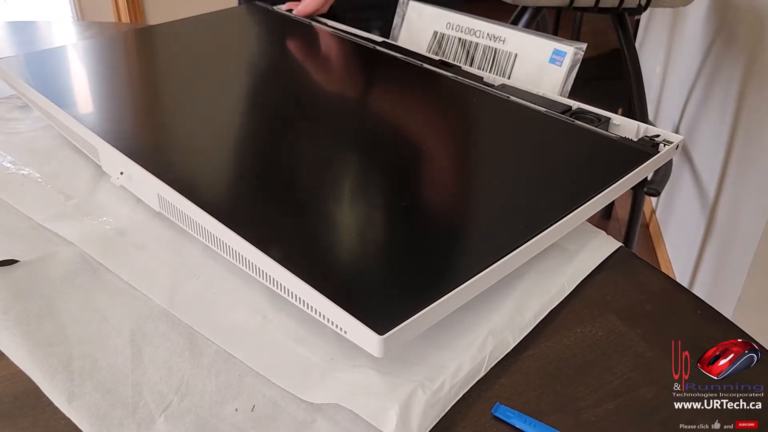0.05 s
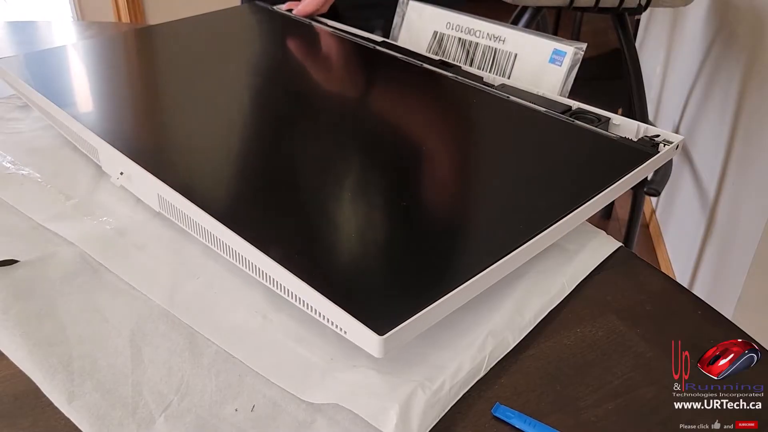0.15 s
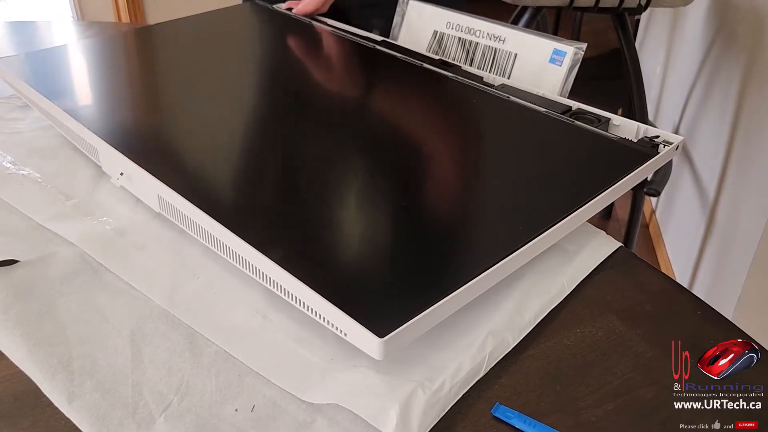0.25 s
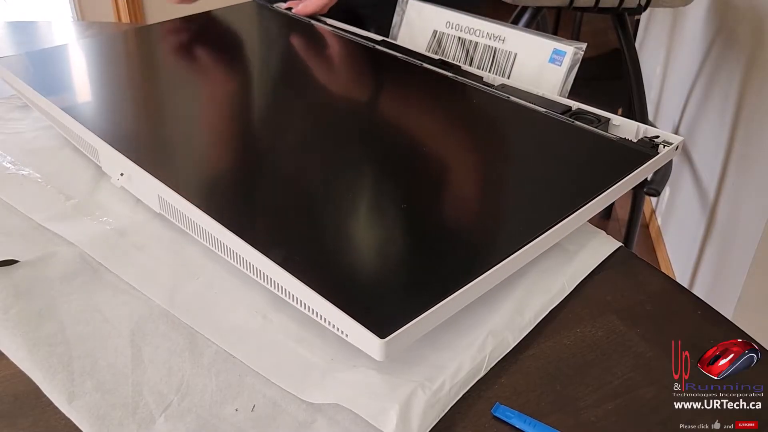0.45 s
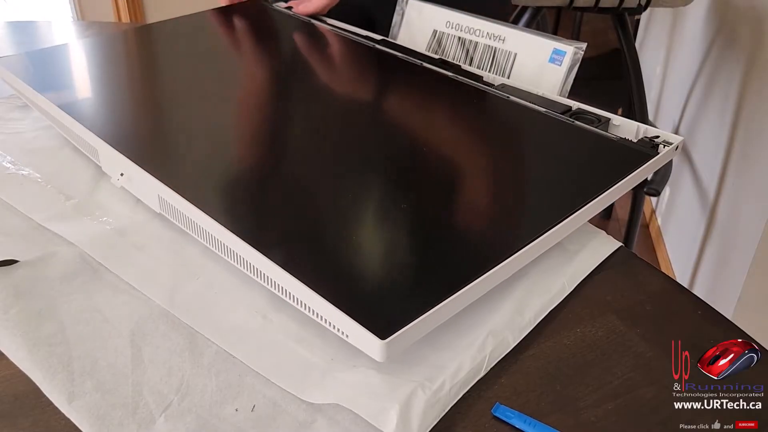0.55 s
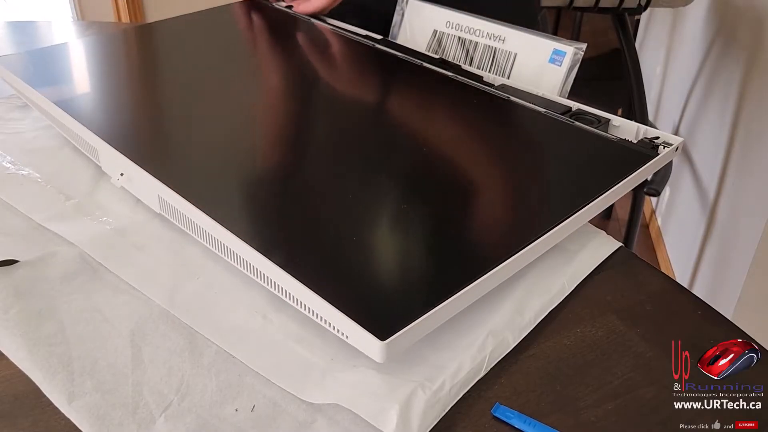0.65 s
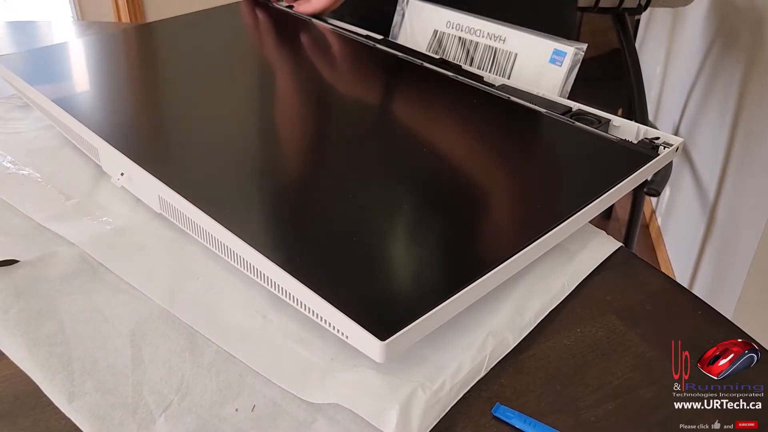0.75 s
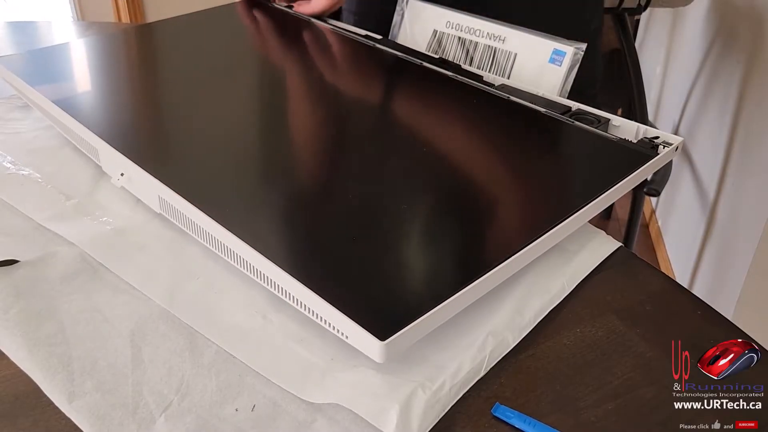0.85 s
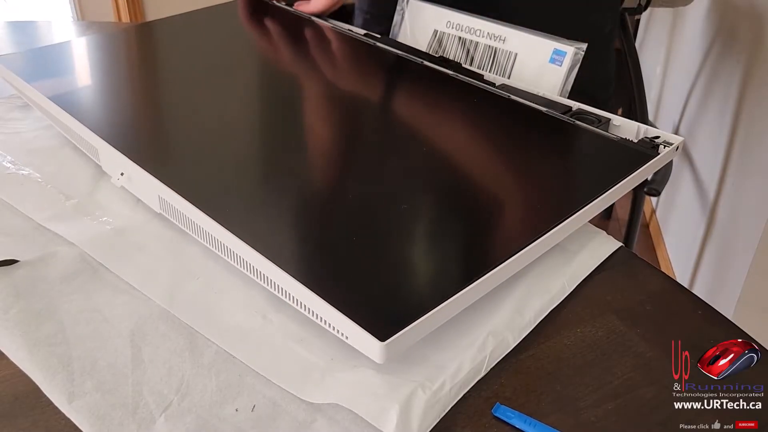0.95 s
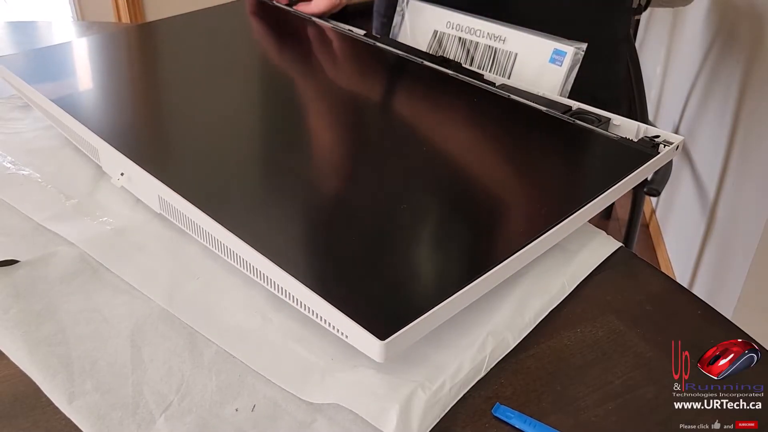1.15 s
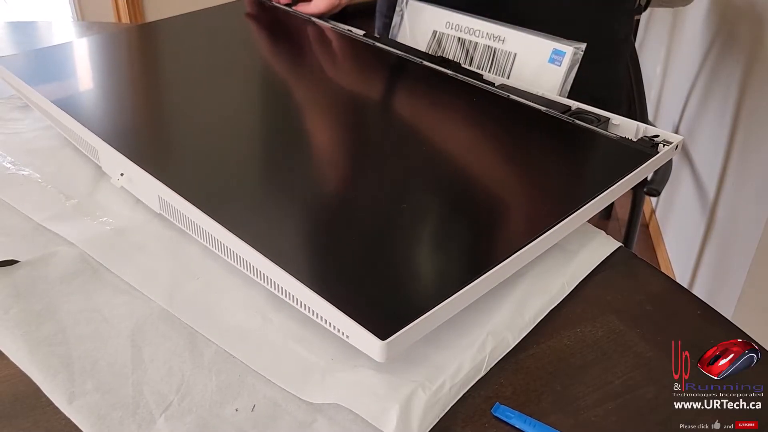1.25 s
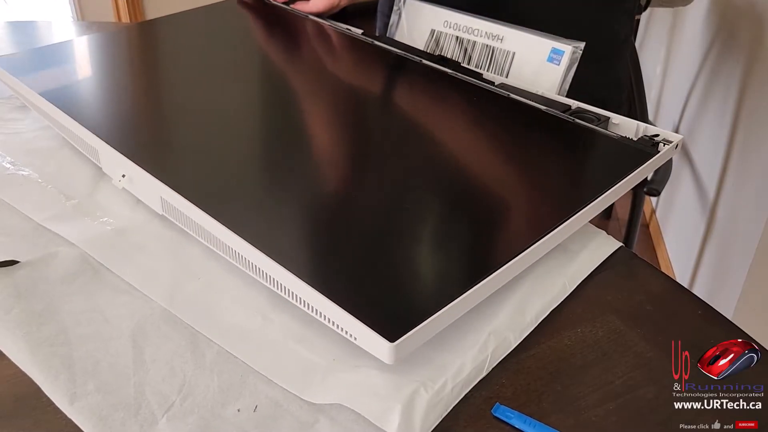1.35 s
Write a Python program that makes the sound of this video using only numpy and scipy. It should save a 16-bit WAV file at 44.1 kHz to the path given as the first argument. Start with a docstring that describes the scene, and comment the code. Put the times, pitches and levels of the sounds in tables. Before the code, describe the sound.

Plastic clips snap loose in sharp cracks as a panel is pried off a housing, then rubbing

```python
"""Clips snapping off a housing

Plastic clips snap loose as a panel is pried off a computer housing on a table, in a small live room.
Each snap is a short run of growing slips that cracks and rings the shell's modes; the panel knocks dully.
The panel rumbles and hums as it flexes; hands and panel rub on as grainy friction and hiss.
Snaps and knocks echo in a tail of sparse taps; steady noise is the room tone."""
import sys
import numpy as np
from scipy import signal
from scipy.fft import rfft, irfft
from scipy.io import wavfile
from scipy.ndimage import uniform_filter1d

SR = 44100
rng = np.random.default_rng(int(sys.argv[2]) if len(sys.argv) > 2 else 0)


def gain_from_db(level_db):
    """Convert decibel levels to linear amplitude factors (20 dB per decade)."""
    decades = np.asarray(level_db, float) / 20
    return 10 ** decades


def transcribe(u):
    """Save the signal u as a 16-bit wav file named by the first command-line argument.

    u: samples, shape (n,) or (channels, n), limited to [-1, 1]; the rate is SR.
    q: integer samples, one column per channel.
    """
    v = np.clip(np.atleast_2d(u).T, -1, 1)
    q = np.round(v * 32767).astype(np.int16)
    wavfile.write(sys.argv[1], SR, q)


N = 61739
RIGHT_LAG_S = .00035

# left-right likeness of diffuse sound: hz, likeness (0-1)
LIKENESS = [(30, 0.95), (150, 0.93), (400, 0.91), (1000, 0.081), (16000, 0)]


def evened(x):
    """Scales to rms 1."""
    return x / np.sqrt(np.mean(x ** 2) + 1e-20)


def unit(x):
    """Scales to energy 1."""
    return x / np.linalg.norm(x)


def read(points, hz):
    """Interpolates a table on a log-frequency axis."""
    f, value = np.transpose(points)
    return np.interp(np.log(hz + 1), np.log(f + 1), value)


def level(rows, axis):
    """Gain curve from a dB column, -120 dB before the first row."""
    rows = np.array(rows)
    return gain_from_db(np.interp(np.arange(N) / SR, rows[:, 0], rows[:, axis], left=-120))


def add(mix, start_s, sound):
    """Mixes a sound in at start_s."""
    part = mix[round(start_s * SR):][:len(sound)]
    part += sound[:len(part)]


def resonate(x, hz, width_hz):
    """One-pole complex resonance of about unit gain at its centre."""
    r = np.exp(-np.pi * width_hz / SR)
    pole = r * np.exp(2j * np.pi * hz / SR)
    return 2 * signal.lfilter([1 - r], [1, -pole], x).real


def noise(tone):
    """Stereo noise of rms 1 with a given spectrum; the right channel shares part of the left."""
    hz = np.fft.rfftfreq(N, 1 / SR)
    a, b = rfft(rng.standard_normal((2, N)))
    same = np.clip(read(LIKENESS, hz), -1, 1)
    pair = np.array([a, same * a + np.sqrt(1 - same ** 2) * b])
    return evened(irfft(pair * gain_from_db(read(tone, hz)), N))


def room_tone():
    """Steady background of shaped noise."""
    # spectrum: hz, density_db_per_hz (relative)
    floor_tone = [(15, -30), (25, -9.5), (55, -1.5), (90, -10.5), (180, -19), (280, -18.5), (370, -15.5),
                  (480, -26.5), (860, -19), (1400, -27.5), (2100, -23), (3000, -35.5), (6000, -39.5),
                  (8500, -41.5), (11000, -62), (16000, -70)]
    floor_db = -62.5
    return gain_from_db(floor_db) * noise(floor_tone)


def room(x):
    """Echo: sparse taps of random sign, each band dying at its own speed."""
    # decay: hz, t60_s
    decay = [(100, 0.74), (400, .6), (1000, 0.69), (2500, 0.5), (5500, 0.56), (9000, 0.35), (14000, 0.22)]
    # starting spectrum of the tail: hz, level_db
    tail_tone = [(100, 0), (500, 4.5), (1200, 2), (2500, 1.5), (5500, 1.5), (10000, 1), (13000, 1.5),
                 (16000, -5)]
    echo_db, pan_db = -5, 1.5  # pan: left minus right
    start_s, rise_s = 0.0041, 0.0023
    taps = np.zeros((2, SR))
    slots = np.arange(0, SR - 20, 16)
    at = slots + rng.integers(0, 16, (2, len(slots)))
    np.put_along_axis(taps, at, rng.choice([-1., 1.], at.shape), 1)

    hz, t, z = signal.stft(taps, SR, nperseg=256)
    same = np.clip(read(LIKENESS, hz), 0, 1)[:, None]
    z = np.array([z[0], same * z[0] + np.sqrt(1 - same ** 2) * z[1]])
    band_db = read(tail_tone, hz)[:, None] - 60 * t / read(decay, hz)[:, None]
    tail = signal.istft(z * gain_from_db(band_db), SR, nperseg=256)[1]
    tail = tail * np.clip((np.arange(tail.shape[1]) / SR - start_s) / rise_s, 0, 1)
    tail = tail / np.linalg.norm(tail, axis=1, keepdims=True)
    tail = tail * gain_from_db(np.array([[.5], [-.5]]) * pan_db)
    return gain_from_db(echo_db) * signal.fftconvolve(x[None], tail, axes=1)[:, :N]


def rubbing():
    """Grainy friction into the housing's resonances, with a smooth hiss above."""
    # course: start_s, body_db, hiss_db, highest_hiss_db
    course = [(0.74, -68, -70.5, -95), (0.798, -68, -68, -74), (0.846, -53.5, -60.5, -64.5),
              (0.858, -57, -62, -66.5), (0.91, -55, -60, -66.5), (0.974, -67.5, -66.5, -73),
              (0.996, -57.5, -64.5, -83), (1.02, -51, -53, -61.5), (1.048, -49.5, -55.5, -70),
              (1.06, -57, -62.5, -97), (1.1, -51, -61, -68), (1.116, -49, -58.5, -68),
              (1.156, -53.5, -59, -67.5), (1.252, -55.5, -69, -100.5), (1.306, -62, -69.5, -106),
              (1.346, -59.5, -65.5, -89.5), (1.38, -63.5, -69.5, -81), (1.4, -62, -71, -81)]
    # housing resonances: centre_hz, width_hz, level_db (relative)
    resonances = [(255, 34, -3), (365, 51, 2.5), (471, 34, -2), (700, 124, 4), (932, 36, 4.5),
                  (1094, 63, 3.5), (1345, 130, -2), (1600, 100, -23), (2050, 135, -15.5)]
    # hiss spectra: hz, density_db_per_hz (relative)
    hiss_tone = [(1200, -62), (2000, 1.5), (3500, -3.5), (6000, -7), (7600, -4.5), (9000, -13),
                 (11000, -49)]
    air_tone = [(7500, -30), (9000, -0.5), (12000, -5), (15000, -5), (16500, -9.5)]
    grains_per_s, grain_spread_db = 900, 4.5
    smooth, shared = 0.44, 0.88  # steady noise against grains; drive common to both sides
    body_below_hz = 2470

    hits = rng.random((3, N)) < grains_per_s / SR
    grains = hits * gain_from_db(grain_spread_db * np.minimum(rng.exponential(1, (3, N)), 3))
    grains = grains * rng.choice([-1., 1.], (3, N))
    drive = evened(grains) + smooth * rng.standard_normal((3, N))
    drive = drive[:2] + shared * drive[2]
    body = sum(gain_from_db(db) * resonate(drive, hz, width_hz) for hz, width_hz, db in resonances)
    body = signal.sosfilt(signal.butter(4, body_below_hz, fs=SR, output="sos"), body)
    hiss = level(course, axis=2) * noise(hiss_tone)
    air = level(course, axis=3) * noise(air_tone)
    return level(course, axis=1) * evened(body) + hiss + air


def flexing():
    """Slow rumble of panel and table, and the panel's lowest mode kept going by the hands."""
    # course: start_s, rumble_db, hum_db
    course = [(0.0, -68.5, -101), (0.092, -76, -66.5), (0.132, -72, -91), (0.264, -48, -47),
              (0.292, -80, -63), (0.54, -76.5, -65), (0.58, -53.5, -50.5), (0.634, -50.5, -66),
              (0.68, -57, -78), (0.72, -58, -60), (0.778, -54, -86), (0.806, -63.5, -92), (0.876, -77, -78),
              (0.93, -59, -82), (1.042, -56.5, -55.5), (1.128, -57, -67.5), (1.164, -54, -53.5),
              (1.238, -64, -61), (1.268, -70, -84), (1.346, -58.5, -85), (1.374, -79, -63.5),
              (1.4, -67, -75)]
    # rumble spectrum: hz, density_db_per_hz (relative)
    rumble_tone = [(10, -2.5), (22, -0.5), (45, -10.5), (80, -11), (130, -45)]
    panel_hz, waver_hz, waver_gain = 136, 5, .3  # both wavers rms
    wander = uniform_filter1d(rng.standard_normal((2, N)), size=1500, axis=1)
    drift, swell = (evened(v) for v in wander)
    phase = 2 * np.pi * np.cumsum(panel_hz + waver_hz * drift) / SR
    hum = (1 + waver_gain * swell) * np.sin(phase)
    return level(course, axis=1) * noise(rumble_tone) + level(course, axis=2) * evened(hum)


def knocks():
    """Dull knocks of the big panel, each one decaying mode with a soft onset."""
    # knocks: start_s, level_db (before the mix gains), pitch_hz, t60_s
    strikes = [(.100, -67, 2110, .08), (.164, -51.5, 861, 0.052), (0.223, -40.5, 112, 0.067),
               (.250, -43, 75.5, 0.093), (.250, -41, 103, .1), (.250, -27, 341, 0.021),
               (.251, -37.5, 241, 0.041), (.251, -20.5, 1047, 0.02), (.223, -48, 515, 0.079),
               (.256, -42, 530, 0.05), (.418, -43, 95, .1), (.418, -31, 350, 0.029),
               (0.482, -43.5, 133, 0.1), (.483, -35.5, 821, 0.044), (0.549, -50, 128.5, 0.25),
               (.821, -39.5, 444, 0.022), (.828, -41, 676, 0.042), (.842, -37.5, 700, .05),
               (1.016, -38.5, 910, 0.027), (1.093, -39, 393, 0.029), (1.094, -43, 1600, .015),
               (1.165, -49.5, 255, 0.098), (0.221, -48, 1490, .02), (.9, -49, 1240, 0.027),
               (1.094, -38.5, 930, 0.039), (1.113, -43.5, 910, 0.075), (1.036, -49, 356, .05),
               (.875, -45.5, 725, 0.031)]
    rise_s = 0.0013
    t, out = np.arange(SR // 3) / SR, np.zeros(N)
    for start_s, db, hz, t60_s in strikes:
        envelope = gain_from_db(db - 60 * t / t60_s) * (1 - np.exp(-t / rise_s))
        add(out, start_s, envelope * np.sin(2 * np.pi * hz * t))
    return out


def snaps():
    # snaps: start_s, slip_ms, crack_db, middle_db, upper_db, top_db (all before snap_gain),
    # best_hz (middle modes struck best), pan_db (left minus right)
    clip_rows = [(.2210, 2.16, -29.5, -25, -43, -47, 2770, 3.5), (0.239, 3.96, -20, -19, -44, -47, 2280, 5),
                 (.2455, 3.9, -31, -53, -39, -58, 2970, -22.5),
                 (.2499, 1.72, -19, -21, -14, -55, 2970, 11.5),
                 (.2530, 1.0, -18.5, -13, -34, -27, 3260, -3),
                 (.2550, 2.7, -27, -20.5, -39, -38, 2380, -3.5), (.3720, 7.4, -33, -52, -39, -56, 2750, -1),
                 (0.4178, 1.9, -20, -14, -24.5, -30.5, 2300, 8.5),
                 (0.4211, 1.0, -31, -26, -40, -52, 2290, -10), (.4420, 5.0, -26.5, -55, -64, -56, 2540, -4),
                 (.4820, 2.335, -18.5, -14.5, -13.5, -20, 2590, 6.5),
                 (0.4859, 2.04, -51, -18.5, -34, -59, 2730, 9),
                 (.5460, 6.0, -21.5, -49, -63, -51, 2620, 1.5), (.5540, 6, -21, -60, -54, -36, 2620, 2.5)]
    # shell modes: pitch_hz, level_db (relative), t60_s
    middle_modes = [(1950, 0, .004), (2350, 0, .005), (2800, -2, .004), (3150, 0, .004), (3550, -1, .0035),
                    (3950, -1, .0035)]
    upper_modes = [(4400, -5, .0025), (4850, -8, .0025), (5450, 0, .0035), (5950, -1, .003),
                   (6500, -7, .0025), (7050, -7, .0025)]
    top_modes = [(7700, -2, .004), (9100, -3, .004), (10350, 0, .004), (12300, -6, .003), (13300, -6, .003),
                 (14600, -5, .003)]
    slips_per_s, slip_growth, spread_db, snap_gain = 12000, .3, 1.5, 4
    middle_db_per_octave, echo_modes_db = 20, -1
    crack_above_hz, echo_above_hz = 1000, 220

    t, out = np.arange(1024) / SR, np.zeros((3, N))
    for start_s, slip_ms, crack_db, middle_db, upper_db, top_db, best_hz, pan_db in clip_rows:
        hit = rng.random(320) < slips_per_s / SR
        u = np.arange(320) / SR / (slip_ms / 1000)  # progress through the slip
        growth = (u + 0.085) ** slip_growth * np.clip(5 * (1.1 - u), 0, 1)
        slips = hit * rng.uniform(-1, 1, 320) * growth

        middle = [(hz, db - middle_db_per_octave * abs(np.log2(hz / best_hz)), t60_s)
                  for hz, db, t60_s in middle_modes]
        parts = [(crack_db, 1. * (t == 0))]  # the bare crack, then the modes
        groups = (middle_db, middle), (upper_db, upper_modes), (top_db, top_modes)
        for group_db, modes in groups:
            for k, (hz, db, t60_s) in enumerate(modes):
                ring = (-1) ** k * gain_from_db(-60 * t / t60_s) * np.sin(2 * np.pi * hz * t)
                parts.append((group_db + db + spread_db * rng.standard_normal(), ring))

        sound = snap_gain * sum(gain_from_db(db) * unit(np.convolve(slips, ring)) for db, ring in parts)
        add(out[0], start_s, sound * gain_from_db(pan_db / 2))
        add(out[1], start_s + RIGHT_LAG_S, sound * gain_from_db(-pan_db / 2))
        # echo feed: one undivided strike at mid-slip, summed over all directions
        feed = sum(gain_from_db(db + (k > 0) * echo_modes_db) * unit(ring) for k, (db, ring) in enumerate(parts))
        add(out[2], start_s + slip_ms / 2000, snap_gain * feed)
    near = signal.butter(3, crack_above_hz, "high", fs=SR, output="sos")
    echo = signal.butter(3, echo_above_hz, "high", fs=SR, output="sos")
    return np.vstack([signal.sosfilt(near, out[:2]), signal.sosfilt(echo, out[2:])])


def scene():
    """Snaps and knocks with their echo, over flexing, rubbing and room tone."""
    clips, panel = snaps(), knocks()
    panel_right = np.roll(panel, round(RIGHT_LAG_S * SR))
    near = clips[:2] + np.array([gain_from_db(2.95) * panel, gain_from_db(1.1) * panel_right])
    echo = room(clips[2] + 0.72 * panel)
    return near + echo + flexing() + rubbing() + room_tone()


def low_pass(x):
    """Removes everything above the highest recorded frequency."""
    return signal.sosfilt(signal.butter(12, 16810, fs=SR, output="sos"), x)


def record(dry):
    """Limits the band to 16 kHz with a linear-phase low-pass and finishes the mix."""
    edge = signal.firwin(255, 16000, window=("kaiser", 8), fs=SR)
    mix = signal.oaconvolve(dry, edge[None], "same")
    return low_pass(mix)


dry = scene()
out = record(dry)
transcribe(out)
```